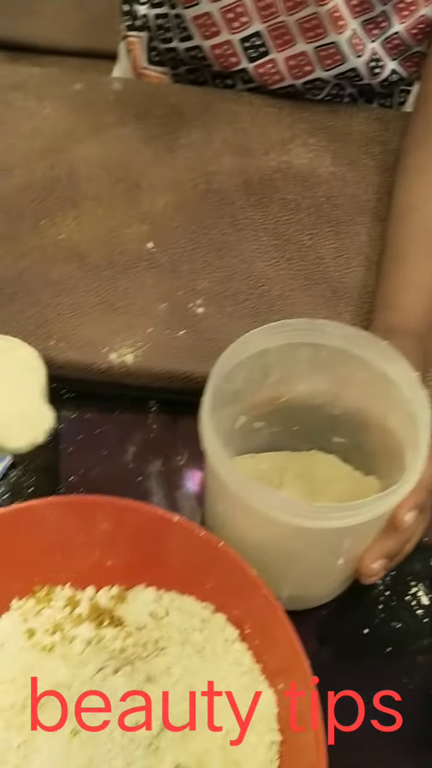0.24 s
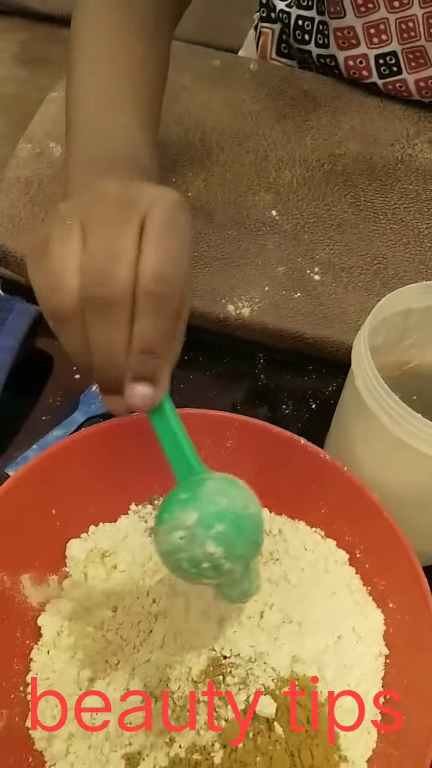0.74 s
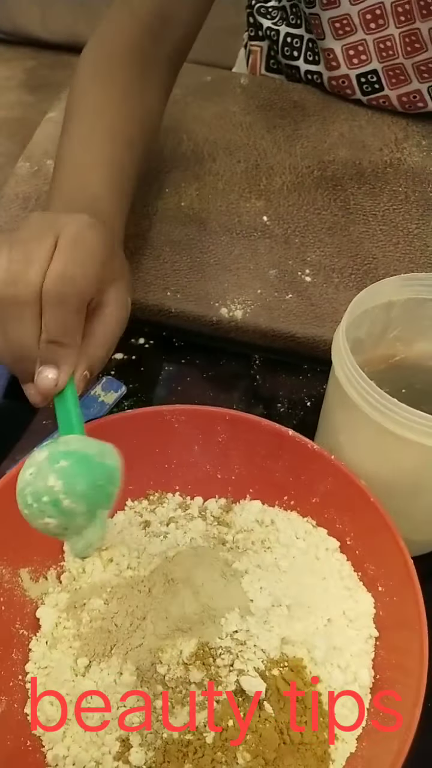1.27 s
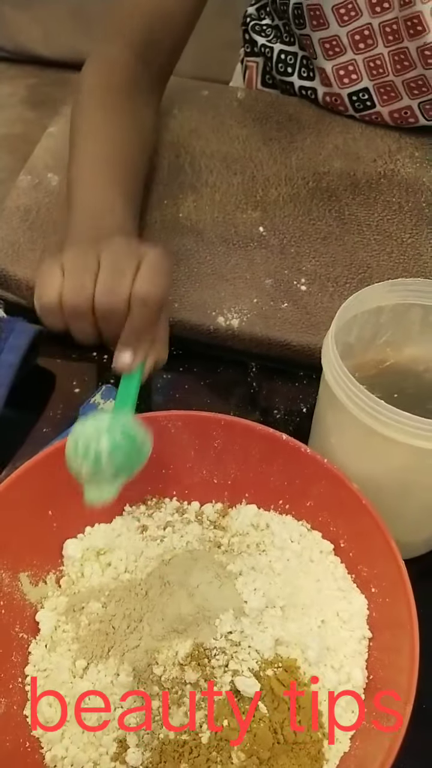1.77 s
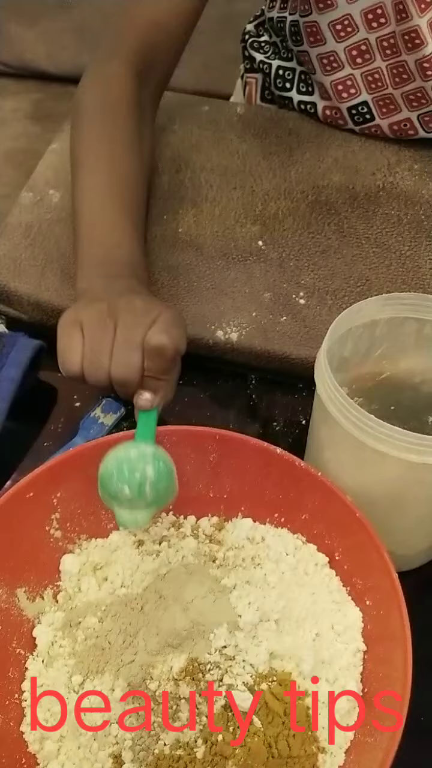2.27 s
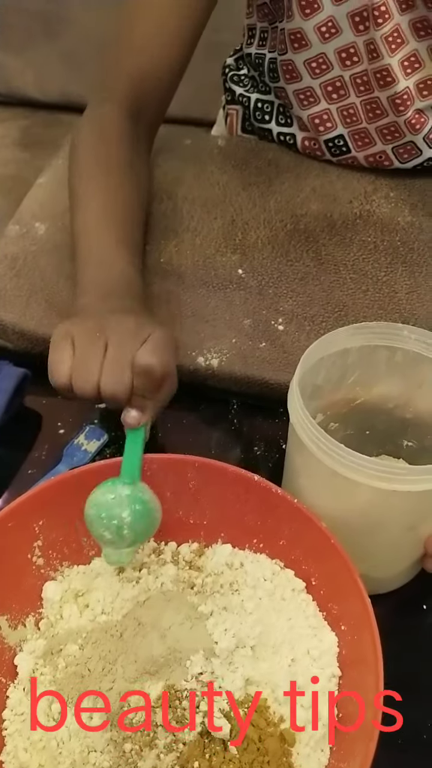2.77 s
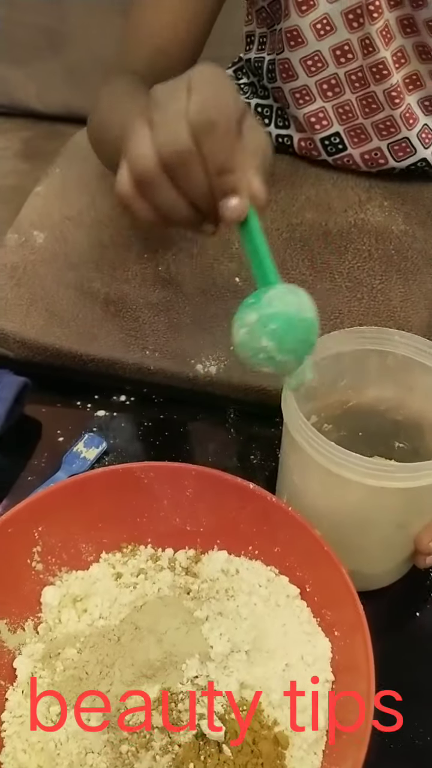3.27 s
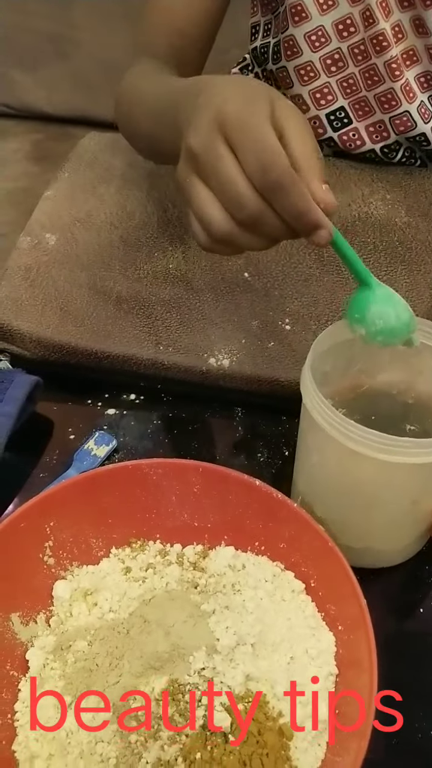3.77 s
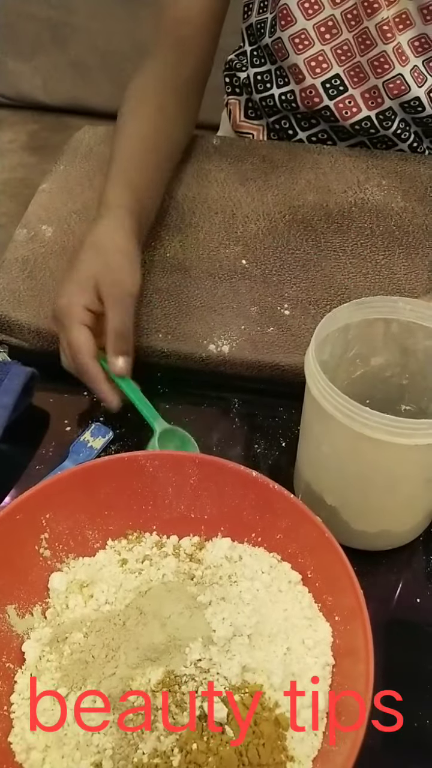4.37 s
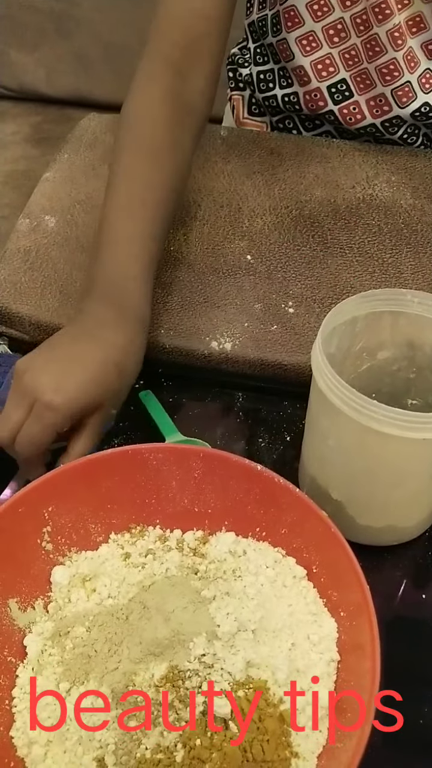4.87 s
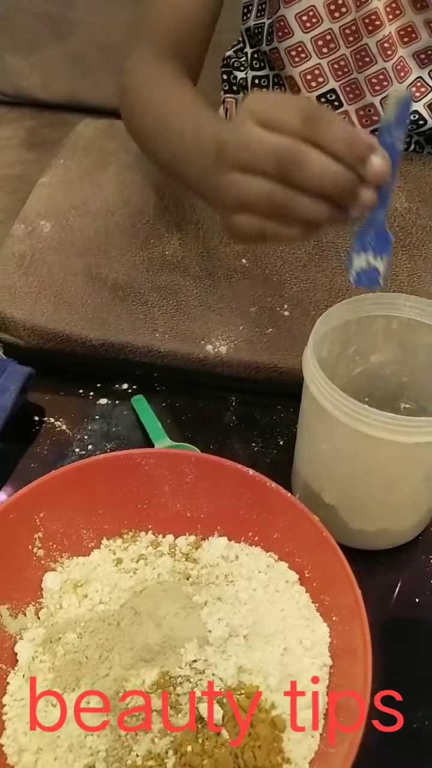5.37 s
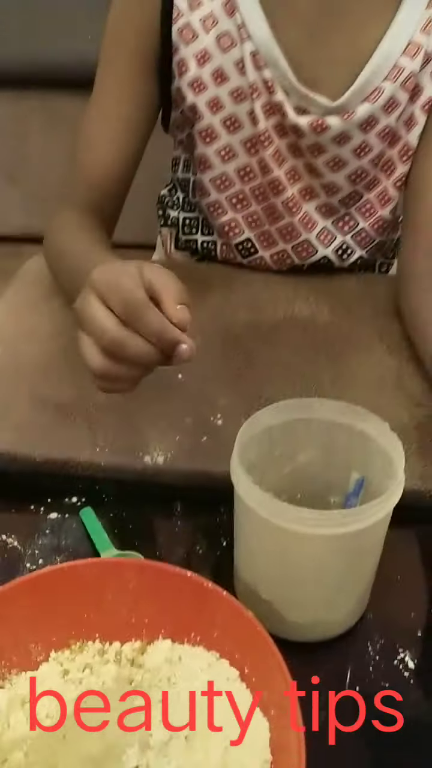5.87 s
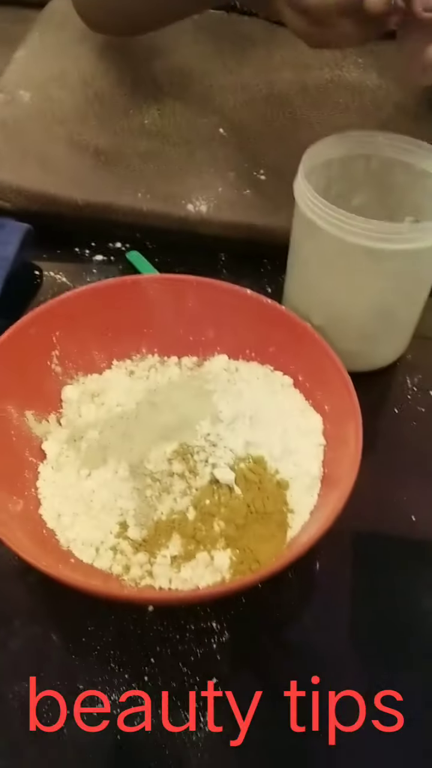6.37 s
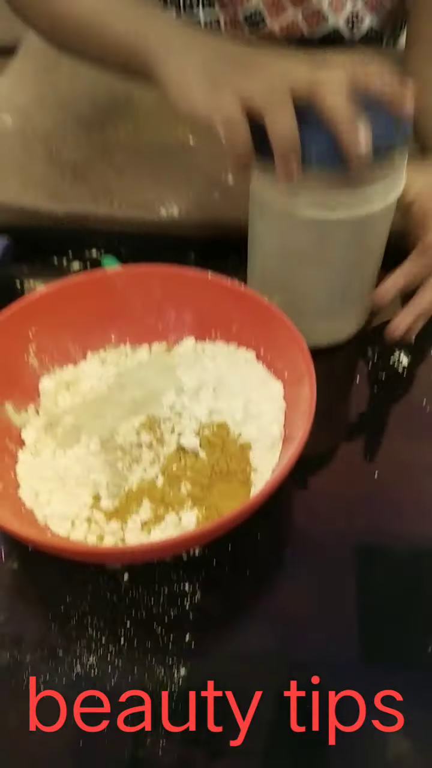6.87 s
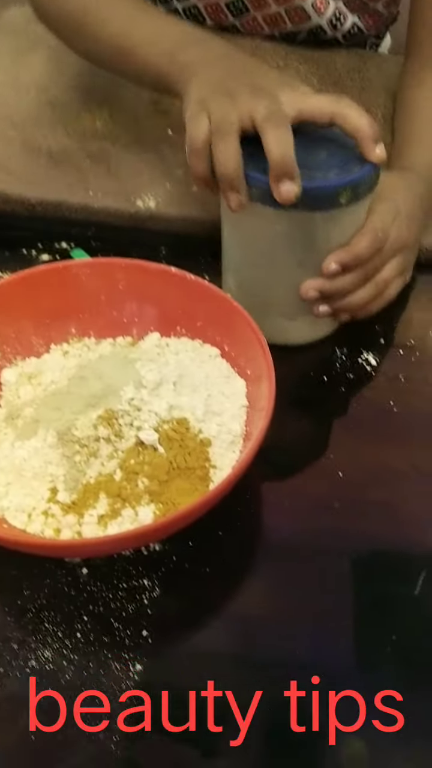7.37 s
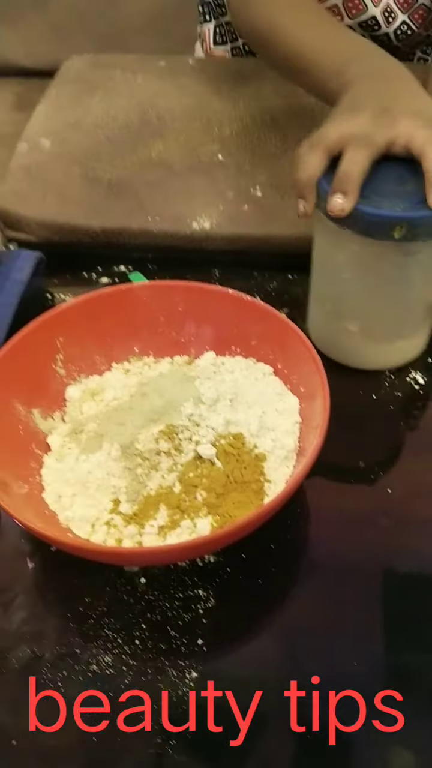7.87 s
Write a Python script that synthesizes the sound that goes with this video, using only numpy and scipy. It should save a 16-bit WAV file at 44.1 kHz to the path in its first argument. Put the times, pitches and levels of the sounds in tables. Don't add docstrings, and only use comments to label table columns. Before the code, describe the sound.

Six hollow raps of a plastic scoop on a jar rim, a sharp drop and bounces on a table, then a lid rattling shut.

```python
import sys
import numpy as np
from scipy import signal
from scipy.fft import rfft, irfft, next_fast_len
from scipy.io import wavfile
from scipy.ndimage import uniform_filter1d

SR = 44100
rng = np.random.default_rng(int(sys.argv[2]) if len(sys.argv) > 2 else 0)


def store_pcm(level_fs):
    pcm = np.round(np.clip(level_fs, -1, 1) * 32767).astype(np.int16)
    wavfile.write(sys.argv[1], SR, np.atleast_2d(pcm).T)


def elevation(decibels):
    levels = np.asarray(decibels, float)
    return 10 ** (levels / 20)


N = 358312

# (frequency [Hz], density [dB per Hz], left-right [dB])
JAR_CONTACT = [(296, -0.5, 6), (1130, 10.5, 9), (2200, -1, 7), (3167, -11, 25), (4000, -3.5, -1.5),
               (4760, -9.5, -1), (9400, -20, 20), (15300, -37.5, 16)]
# (frequency [Hz], density [dB per Hz], left-right [dB])
SMALL_CONTACT = [(300, -17, 1.5), (1190, -19, 1.8), (3400, -3, 9.9), (4200, -13, 4), (6430, -13, 1.8),
                 (14500, -48, 3)]
# (frequency [Hz], density [dB per Hz], left-right [dB])
LID_CONTACT = [(200, -10, 1.5), (700, -12, 2.3), (1860, -2.5, 1.7), (3320, -12, 5.5), (4200, -15, 4.9),
               (4880, -7, 3.4), (14700, -81, 4.3)]


def rms_one(x):
    return x / np.sqrt(np.mean(x ** 2) + 1e-20)


def at_hz(points, hz, column=1):
    points = np.array(points)
    return np.interp(np.log(hz), np.log(points[:, 0]), points[:, column])


def sides(pan_db):
    return elevation(np.array([pan_db / 2, -pan_db / 2]))


def drift(rate_hz):
    pole = np.exp(-80 * np.pi * rate_hz / SR)
    white = rng.standard_normal(N // 40 + 2002)
    slow = signal.lfilter([1], [1, -2 * pole, pole * pole], white)[2000:]
    return np.interp(np.arange(N) / 40, np.arange(len(slow)), rms_one(slow))


def bands(white, skip=0):
    # (frequency [Hz], left-right likeness [-1..1])
    likeness = [(60, 0.676), (180, 1), (550, 0.393), (1650, -0.22), (4970, -0.048), (15000, -0.15)]
    # (frequency [Hz], left-right [dB])
    lean = [(60, 1.5), (240, 2.5), (950, -0.5), (3770, 2.5), (15000, 3.5)]
    edges_hz = 22 * 2 ** np.arange(skip / 2, 9.6, 0.5)
    for k, (low_hz, high_hz) in enumerate(zip(edges_hz, edges_hz[1:])):
        sos = signal.butter(2, [low_hz, high_hz], "band", fs=SR, output="sos")
        mid_side = signal.sosfilt(sos, white[k % 2])
        hz = np.sqrt(low_hz * high_hz)
        alike = np.clip(at_hz(likeness, hz), -1, 1)
        mix = np.sqrt([1 + alike, 1 - alike]) * [[1, 1.0], [1, -0.89]]
        mix = mix * sides(at_hz(lean, hz))[:, None]
        yield hz, mix @ mid_side


def contact_tone_db(hz, bass_db, treble_db):
    octaves = np.log2(hz / 1000)
    return np.interp(octaves, [-0.83, -0.34, 0.7, 3.5], [bass_db, 0, 0, treble_db])


def blows(events, modes, crack, crack_db, smear_s, wet_db):
    hz, level_db, t60_s, pan_db = np.transpose(modes)
    t = np.arange(4096) / SR
    bins_hz = np.maximum(np.arange(2049) * SR / 4096, 30)
    luck = rng.standard_normal((len(events), 4, len(modes)))
    noise = rng.standard_normal((len(events), 3, len(bins_hz)))
    usual = rng.standard_normal((3, len(bins_hz)))
    late_s = 0.000943 * rng.random(len(modes))
    since = np.maximum(t - late_s[:, None], 0)
    decay = elevation(-60 * since / t60_s[:, None])
    sign = (-1) ** np.arange(len(hz))
    out = np.zeros((2, N + len(t)))
    for event, (both, left, right, tune), fresh in zip(events, luck, noise):
        s, peak_db, bass_db, treble_db = event
        mode_hz = hz * (1 + 0.004 * tune)
        rings = np.sin(2 * np.pi * mode_hz[:, None] * since) * decay
        luck_db = 1.1 * (both + np.array([left, right]))
        strength = sign * elevation(level_db + contact_tone_db(hz, bass_db, treble_db) + luck_db)

        wander = 6 * uniform_filter1d(usual + 0.5 * fresh, size=45)
        delay_s = smear_s * (wander[0] + 0.6065 * wander[1:]) ** 2 + 0.0004 + 0.6037 / bins_hz
        colour = elevation(at_hz(crack, bins_hz) + contact_tone_db(bins_hz, bass_db, treble_db) + crack_db)
        colour = colour * sides(at_hz(crack, bins_hz, column=2))
        colour *= bins_hz ** 2 / (bins_hz ** 2 + 200 ** 2)
        phase = 2 * np.pi * np.cumsum(delay_s, axis=1) * SR / len(t)
        burst = irfft(colour * np.exp(-1j * phase))

        sound = (strength * sides(pan_db)) @ rings + burst
        sound = sound * np.cos(np.pi / 2 * t / t[-1])
        at = round(s * SR)
        out[:, at:at + len(t)] += elevation(peak_db) * sound / np.abs(sound.mean(axis=0)).max()
    direct = out[:, :N]
    return direct, elevation(wet_db) * direct


def fan():
    # (frequency [Hz], width [Hz], level [dB])
    motor_lines = [(101.3, 5.76, -69.5), (144.3, 24, -80), (165, 12, -78), (196.4, 4.01, -63),
                   (231.7, 4.03, -66), (290.2, 0.6, -66.5), (384, 2.2, -69), (508, 3.7, -76.5)]
    out = np.zeros(N)
    for hz, width_hz, level_db in motor_lines:
        pole = np.exp(-np.pi * width_hz / SR)
        feedback = [1, -2 * pole * np.cos(2 * np.pi * hz / SR), pole * pole]
        line = signal.lfilter([1, 0, -1], feedback, rng.standard_normal(N))
        out += elevation(level_db) * rms_one(line)
    return out


def whine():
    # (frequency [Hz], starting level [dB], slope [dB per s])
    orders = [(1620, -75.5, -4), (1603, -73.5, -0.5), (1660, -88.5, 1.95), (1875, -75.5, -0.9)]
    t = np.arange(N) / SR
    turned_s = np.cumsum(1 + 0.00056 * drift(2.4)) / SR
    out = np.zeros(N)
    for hz, level_db, slope_db in orders:
        gain = elevation(level_db + slope_db * t + 1.05 * drift(1.1))
        out += gain * np.sin(2 * np.pi * hz * turned_s)
    return out


def room_air():
    # (time [s], level [dB])
    rumble = [(0.0, -57.5), (1.4, -58.5), (1.6, -55), (2.3, -57), (3.3, -58), (4.1, -56.5), (4.9, -57.5),
              (5.3, -55.5), (6.0, -58.5), (6.4, -57.5), (7.0, -55.5), (8.12, -57)]
    # (frequency [Hz], density [dB per Hz])
    air_spectrum = [(18, -48.5), (30, -1), (86, -8.5), (141, -0.5), (287, -5.5), (394, -16.5), (437, -12.5),
                    (486, -13), (1460, -20), (1590, -19), (2060, -26.5), (15000, -43.5), (16000, -47)]
    white = rng.standard_normal((2, 2, N))
    air = sum(pair * elevation(at_hz(air_spectrum, hz)) for hz, pair in bands(white, skip=1))
    s, level_db = np.transpose(rumble)
    return elevation(np.interp(np.arange(N) / SR, s, level_db) + 1.0) * rms_one(air)


def strokes():
    # (time of height [s], hiss [dB], swell [s per 10 dB], fade [s per 10 dB])
    palm = [(0.0, -67.5, .1, 0.2), (.11, -73, 0, -1.1), (.4, -66, -3.4, -0.67), (.68, -76, -4, 1.4),
            (.745, -71, 0.35, -0.9), (1.04, -68, -1.9, -0.23), (5.035, -66, 0, .02)]
    # (time of height [s], hiss [dB], swell [s per 10 dB], fade [s per 10 dB])
    sleeve = [(2.69, -69, 0.044, 0.078), (3.0, -78.5, 0.38, 0.13), (3.3, -78, 0.11, 0.19),
              (3.59, -76, .1, 0.089), (3.74, -68.5, 0.2, 0.062), (4.3, -69.5, 0.031, 0.042),
              (4.6, -69.5, 0.013, 0.26), (4.77, -82.5, 0.18, .1), (5.19, -63, 0.022, 0.074),
              (6.11, -69.5, 0.31, 0.5), (6.43, -71, 0.075, .05), (7.69, -71.5, 0.035, 0.05),
              (7.95, -61.5, 0.088, 0.17), (8.08, -69.5, 0.12, 0.071)]
    # (time of height [s], hiss [dB], swell [s per 10 dB], fade [s per 10 dB])
    thumb = [(5.41, -61.5, 0.056, 0.037), (5.445, -62, 0.047, 0.0066), (5.685, -65.5, 0.11, 0.11),
             (5.855, -58, 0.083, 0.0053), (5.91, -71, 0.048, .1), (6.04, -67.5, 0.082, 0.092),
             (6.15, -70.5, 0.13, 0.096)]
    # (time of height [s], hiss [dB], swell [s per 10 dB], fade [s per 10 dB])
    twist = [(6.47, -59.5, 0.036, .05), (6.53, -44.5, 0.026, 0.036), (6.72, -56, .02, 0.034),
             (6.755, -57, 0.03, 0.065), (6.925, -55, 0.02, 0.047), (7.18, -53, 0.01, 0.032),
             (7.29, -58.5, 0.12, 0.23), (7.39, -58, 0.12, 0.062)]
    roundness = 0.27
    t = np.arange(0, N + 64, 64) / SR
    rest = np.ones((2, len(t)))
    hiss, body = rest * elevation(2 * -106), rest * elevation(2 * -71)
    # (strokes, body over hiss [dB], left-right [dB])
    rubbers = [(palm, -6, 7.7), (sleeve, 3.1, -0.3), (thumb, -5.5, 14), (twist, 0, 1.3)]
    for rows, body_db, pan_db in rubbers:
        s, level_db, swell_s, fade_s = np.transpose(rows)[:, :, None]
        before = (s - t) / np.maximum(swell_s, 0.015)
        after = (t - s) / np.maximum(fade_s, 0.004)
        away = np.where(t < s, before, after)
        drop_db = 10 * away ** 2 / (away + roundness + 1e-9)
        power = elevation(2 * (level_db - drop_db)).sum(axis=0) * sides(pan_db)[:, None] ** 2
        hiss = hiss + power
        body = body + power * elevation(2 * body_db)
    now = np.arange(N) / SR
    return [np.array([np.interp(now, t, np.sqrt(side)) for side in layer]) for layer in (hiss, body)]


def rubbing():
    # (frequency [Hz], density [dB per Hz])
    hiss_spectrum = [(880, 10), (1500, 9), (2210, -47.5), (2640, -8.5), (4460, 3), (6180, 9), (7320, -1.5),
                     (13700, -4), (15600, -15), (16000, -39)]
    # (frequency [Hz], density [dB per Hz])
    body_spectrum = [(180, -40), (300, -32.5), (317, -38), (684, -1), (822, -17.5), (2620, -7),
                     (4000, -20.5), (5200, -32.5), (8800, -120)]
    hiss_gain, body_gain = strokes()
    grain = elevation(0.8 * np.minimum(rng.exponential(1, N), 5))
    together, hiss, body = drift(50), 0, 0
    for hz, pair in bands(rng.standard_normal((2, 2, N)) * grain, skip=7):
        pair = pair * elevation(0.54 * together + 1.84 * drift(31.96))
        hiss += pair * elevation(at_hz(hiss_spectrum, hz))
        body += pair * elevation(at_hz(body_spectrum, hz))
    return hiss_gain * rms_one(hiss) + body_gain * rms_one(body)


def table_thumps():
    # (time [s], peak [dB], bass [dB], treble [dB])
    jolts = [(.27, -50, -5.5, 4), (.425, -56, -6, 6), (1.386, -38, 0, -30), (2.056, -42.5, 0, -30),
             (3.935, -39.5, 3, -31), (4.31, -44, 3, -23), (5.98, -40.5, 4, -32), (6.03, -47, 0, -30)]
    # (frequency [Hz], level [dB], t60 [s], left-right [dB])
    table_modes = [(82, -5, 0.13, 1), (138, -4, 0.075, 5), (240, -5, 0.058, -4), (710, -18, 0.016, 2),
                   (1800, -19, .01, 2)]
    return blows(jolts, table_modes, LID_CONTACT, crack_db=14, smear_s=0.0005, wet_db=-2.5)


def jar_raps():
    # (time [s], peak [dB], bass [dB], treble [dB])
    raps = [(1.383, -9.5, 0.5, 6), (1.3945, -19.5, -23, -2), (1.6025, -13, -3, 1), (1.607, -19.5, -20, -13),
            (1.844, -13, 3, -13), (2.0525, -14.5, 2.5, -3), (2.294, -16, -2, -2), (2.422, -20, 4.5, -17)]
    # (frequency [Hz], level [dB], t60 [s], left-right
    # [dB])
    jar_modes = [(158, -7, 0.044, -2), (210, -10, 0.063, -7), (281, -13, 0.063, 7), (381.5, -9, 0.05, 3),
                 (585, -8, 0.03, -4.5), (683.6, -9.5, 0.077, 8), (727, -6, 0.05, 11), (914, -4, 0.028, 4),
                 (971, -0.5, 0.044, 0), (1061, -1, 0.087, -4.5), (1098, 0.5, 0.053, 3)]
    return blows(raps, jar_modes, JAR_CONTACT, crack_db=24.9, smear_s=0.000302, wet_db=-6.5)


def cup_raps():
    # (time [s], peak [dB], bass [dB], treble [dB])
    raps = [(1.383, -11.5, 2, -6), (1.3905, -21, -13, 13), (1.6025, -17, 15, 0), (1.607, -24, -3, 13),
            (1.844, -14, 4, 4.5), (2.0525, -13, 1, -2.5), (2.294, -14, 10, 5.5), (2.422, -20, 2, 1.5)]
    # (frequency [Hz], level [dB], t60 [s], left-right [dB])
    cup_modes = [(1264, 4, 0.02, -4), (1306, -8, 0.047, -2), (1400, -4.5, 0.068, -8),
                 (1530, -4.5, 0.025, -10), (1760, -8.5, 0.02, 2), (1960, -5.5, 0.032, 7),
                 (2115, -7.5, 0.013, 10), (2270, -0.5, 0.0083, 13), (2750, -9, 0.0077, -5),
                 (3450, -13.5, 0.0081, 4), (4000, -13.5, 0.0098, 7), (4800, -7, 0.019, 10),
                 (5520, -11, 0.0089, 19.5), (5790, -20, 0.018, 12)]
    return blows(raps, cup_modes, JAR_CONTACT, crack_db=24.5, smear_s=0.0003, wet_db=-8.0)


def spoon_drop():
    # (time [s], peak [dB], bass [dB], treble [dB])
    landings = [(3.930, -8, -7, -3), (3.941, -27, -10, -15), (3.958, -23.5, -10, -13), (4.295, -47, -2, -4),
                (4.46, -56, -12, 14), (4.590, -48.5, -25, 12), (4.601, -46, -25, 1.5)]
    # (frequency [Hz], level [dB], t60 [s], left-right
    # [dB])
    spoon_modes = [(408.5, -8.5, 0.18, 1.9), (863, 0, 0.022, 1.8), (966, -7.5, 0.043, 2.5),
                   (1049, -3.5, 0.058, 2.5), (1157, -3, 0.06, 13.5), (1456, -1.5, 0.021, 2.4),
                   (1820, -9.5, 0.033, 14), (2104, -9, 0.079, 5.4), (2425, -3, 0.064, 20),
                   (2480, -4.5, 0.061, 13), (2900, -15.5, 0.048, 11), (3110, -3.5, 0.023, 10),
                   (3560, -6, 0.035, 13), (4360, -7.5, 0.031, 7.7)]
    # (frequency [Hz], density [dB per Hz], left-right [dB])
    contact = [(300, -31, 2.1), (1000, -29, 2.3), (2520, -11.5, 13), (4200, -10, 8.1), (4920, -14.5, 4.1),
               (8900, -26, 5.4), (15000, -30, 6)]
    return blows(landings, spoon_modes, contact, crack_db=35.6, smear_s=0.00072, wet_db=-0.5)


def spoon_bounces():
    # (time [s], peak [dB], bass [dB], treble [dB])
    bounces = [
        (4.021, -14.5, 2, 9.5),
        (4.113, -22.5, -11, 8),
        (4.148, -31.5, -5, -1),
        (4.612, -52, -4, -3),
    ]
    # (frequency [Hz], level [dB], t60 [s], left-right
    # [dB])
    edge_modes = [(408, -13.5, 0.077, 2.7), (960, -6, 0.038, 2.5), (1147, -0.5, 0.025, 11),
                  (1450, -10, 0.087, 3.3), (2450, -14, 0.066, 16), (2500, -20, 0.042, 6.1),
                  (3380, 3, 0.013, 8.2), (3600, 3, 0.013, 13), (5000, -16, 0.02, 5.5),
                  (6250, -10, 0.024, 6.7)]
    # (frequency [Hz], density [dB per Hz], left-right [dB])
    contact = [(300, -1, 2.2), (1000, -5, 3), (2000, 0, 7.6), (3500, 0, 4.9), (6300, -2.5, 4.3),
               (8600, -10.5, 8.7), (15100, -13, 7)]
    return blows(bounces, edge_modes, contact, crack_db=24.6, smear_s=0.00078, wet_db=-0.5)


def small_spoon_picks():
    # (time [s], peak [dB], bass [dB], treble [dB])
    picks = [(5.132, -17, -2, -15), (5.163, -30, -22, 23), (5.214, -40, -9.5, 19), (6.038, -56, -6, 12),
             (6.903, -50, -18, 35), (7.05, -51.5, 12, 30)]
    # (frequency [Hz], level [dB], t60 [s], left-right [dB])
    small_modes = [(200, -14, 0.014, 1.5), (492, -4, 0.014, 1.2), (757, -11, 0.063, 1.6),
                   (813, -2, 0.034, 1.6), (1140, -7.5, 0.014, 1.5), (1500, -6, 0.015, 1.5),
                   (1890, -7, 0.0089, 2.5), (2430, -17, 0.01, 3.3), (3370, -25, 0.025, 5.1)]
    return blows(picks, small_modes, SMALL_CONTACT, crack_db=25.0, smear_s=0.00052, wet_db=-4.0)


def handle_ticks():
    # (time [s], peak [dB], bass [dB], treble [dB])
    ticks = [(5.222, -41, -3, -9), (5.230, -45, 0, -12), (5.24, -48, 0, -10), (6.027, -47, -3, 13),
             (6.105, -45, -3, 14), (6.137, -42.5, 0, 2)]
    # (frequency [Hz], level [dB], t60 [s], left-right [dB])
    handle_modes = [(600, -26, 0.013, 3), (1510, -4, 0.0095, 4.4), (1930, -1.5, 0.01, 6.5)]
    return blows(ticks, handle_modes, SMALL_CONTACT, crack_db=14.0, smear_s=0.000444, wet_db=-1)


def phone_grip():
    # (time [s], peak [dB], bass [dB], treble [dB])
    taps = [(5.411, -35.5, -5, -4), (5.687, -41, -1, 13), (5.800, -41, 0, 14), (5.807, -37, 4, 16),
            (5.820, -38, -10, 21), (5.825, -35, -4, 18), (5.831, -37, -12, 15), (5.8352, -27, 9, -2),
            (5.8425, -35, -1, -2), (5.852, -25, -4, 13), (5.8532, -36.5, 9, -4), (5.943, -43, 7, -8)]
    # (frequency [Hz], level [dB], t60 [s], left-right [dB])
    case_modes = [(157, 1, 0.0017, 12), (690, -3.5, 0.0086, 55)]
    # (frequency [Hz], density [dB per Hz], left-right [dB])
    contact = [(194, 9, 63), (2230, -2, 34.6), (5800, -5, 37), (8100, -16, 29), (15000, -20, 30)]
    return blows(taps, case_modes, contact, crack_db=25, smear_s=0.00085, wet_db=-38)


def lid_knocks():
    # (time [s], peak [dB], bass [dB], treble [dB])
    knocks = [(6.447, -20, -12, -20), (6.4585, -20.5, -9.5, -8), (6.469, -38, 0, 2), (6.478, -28.5, -8, 8),
              (6.489, -28, 0, -10)]
    # (frequency [Hz], level [dB], t60 [s], left-right [dB])
    rim_modes = [(277, -3.5, 0.019, 1.5), (430, -2.5, .02, 1.3), (497, -4.5, 0.03, 1.5),
                 (603, 2, 0.026, 5.4), (690, -9.5, 0.022, 1.4), (1530, -28, 0.014, 2.5),
                 (2010, -26, 0.015, 2.5), (2990, -27, .01, 2.5)]
    return blows(knocks, rim_modes, LID_CONTACT, crack_db=5.7, smear_s=0.00063, wet_db=-1.0)


def lid_rattle():
    # (time [s], peak [dB], bass [dB], treble [dB])
    rattles = [(6.497, -17, -7, 17), (6.511, -36, 2, -12), (6.520, -23.5, 5, -14), (6.532, -25, -15, -30),
               (6.553, -24.5, 1, -15), (7.176, -45, -26, -18), (7.184, -36, 8, -3), (7.43, -42, 4, 0)]
    # (frequency [Hz], level [dB], t60 [s], left-right [dB])
    lid_modes = [(152, -11.5, 0.056, 1), (221, -6.5, 0.055, 1.3), (280, -3, 0.029, 1.9),
                 (424, -7, 0.019, 8.7), (603, -3.5, 0.013, 2.8), (2100, -33, 0.012, 3),
                 (3180, -7.5, 0.0046, 17), (5260, -26, 0.01, 4)]
    return blows(rattles, lid_modes, LID_CONTACT, crack_db=23.2, smear_s=0.000797, wet_db=-7.0)


def room(x):
    # (frequency [Hz], t60 [s], level [dB])
    echo = [(97.7, 1, 4.5), (258.3, 0.35, 10), (660, 0.59, 0.5), (1740, 0.53, -2.5), (4940, 0.5, -1.5),
            (12880, 0.31, 1)]
    t, out = np.arange(SR // 2) / SR, 0
    size = next_fast_len(N + len(t))
    early = 1 + 2.64 * np.exp(-t / 0.007)
    onset = np.clip((t - 0.004) / 0.0028, 0, 1)
    fade = np.cos(np.pi / 2 * t / t[-1])
    for side in x:
        tail = 0
        for hz, pair in bands(rng.standard_normal((2, 2, len(t))), skip=3):
            tail = tail + pair * elevation(at_hz(echo, hz, column=2) - 60 * t / at_hz(echo, hz))
        tail = tail * early * onset * fade
        tail = tail / np.sqrt(2 * np.sum(tail ** 2))
        out = out + rfft(side, size) * rfft(tail, size)
    return irfft(out, size)[:, :N]


def scene():
    hits = [table_thumps(), jar_raps(), cup_raps(), spoon_drop(), spoon_bounces(), small_spoon_picks(),
            handle_ticks(), phone_grip(), lid_knocks(), lid_rattle()]
    direct, sent = map(sum, zip(*hits))
    return direct + room(sent) + fan() + whine() + room_air() + rubbing()


def roll_off(x):
    return signal.sosfilt(signal.butter(12, 16500, fs=SR, output="sos"), x)


def record(dry):
    port_hz, port_width_hz, port_lift = 6400, 1020, 0.64
    mix = signal.sosfilt(signal.butter(2, 85, "high", fs=SR, output="sos"), dry)
    port = signal.iirpeak(port_hz, port_hz / port_width_hz, fs=SR)
    mix = mix + port_lift * signal.lfilter(*port, mix)
    mix = signal.sosfilt(signal.cheby2(10, 50, 16300, fs=SR, output="sos"), mix)
    return roll_off(mix)


dry = scene()
out = record(dry)
store_pcm(out)
```